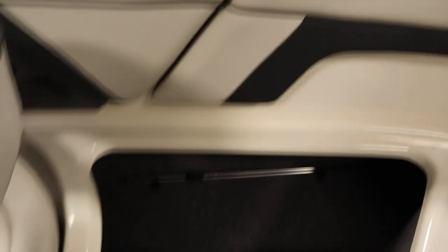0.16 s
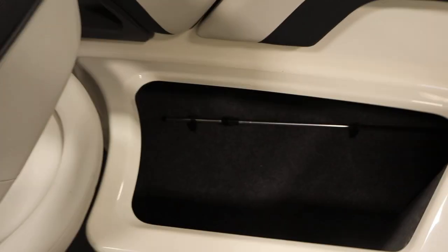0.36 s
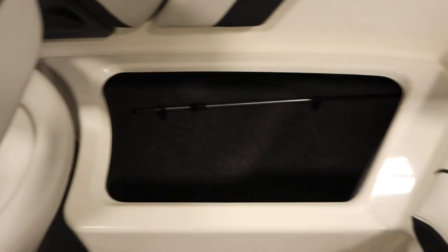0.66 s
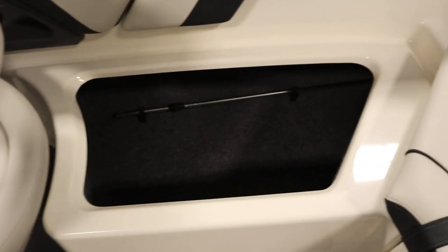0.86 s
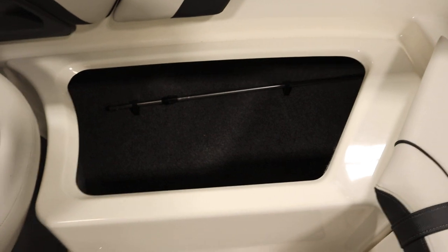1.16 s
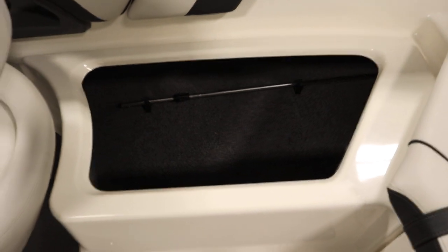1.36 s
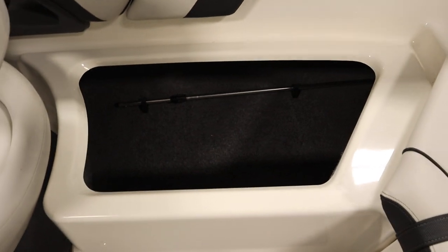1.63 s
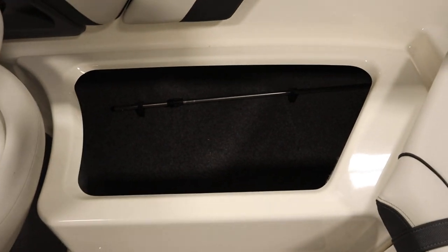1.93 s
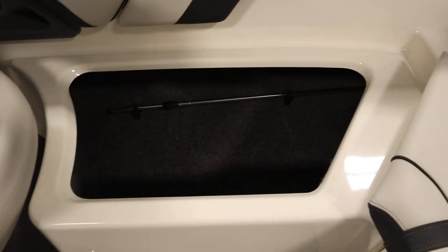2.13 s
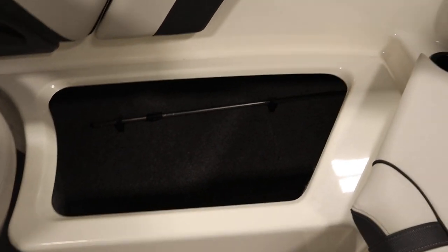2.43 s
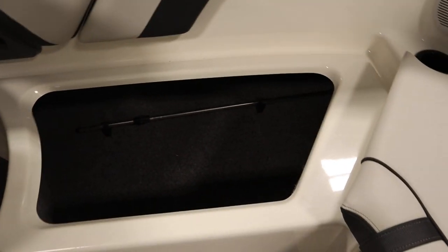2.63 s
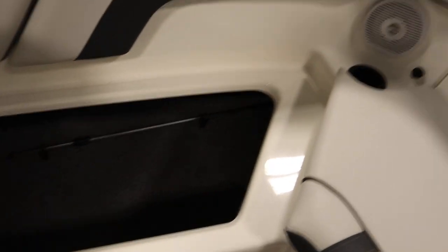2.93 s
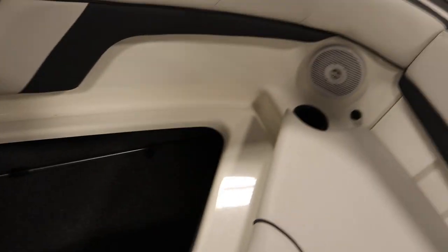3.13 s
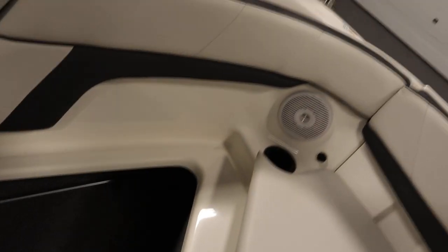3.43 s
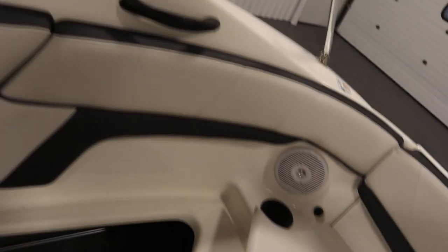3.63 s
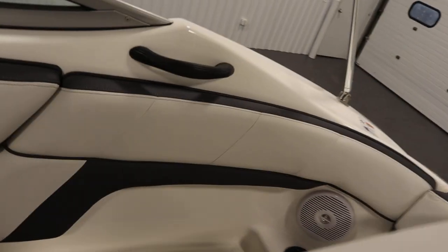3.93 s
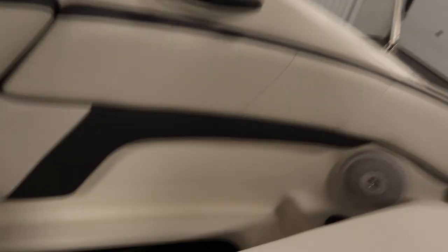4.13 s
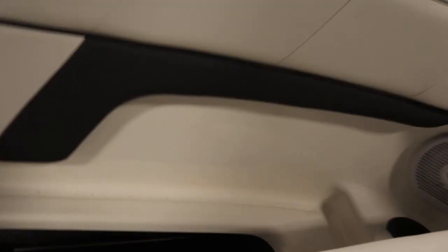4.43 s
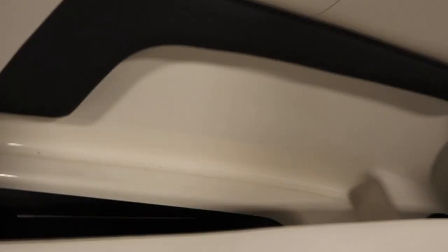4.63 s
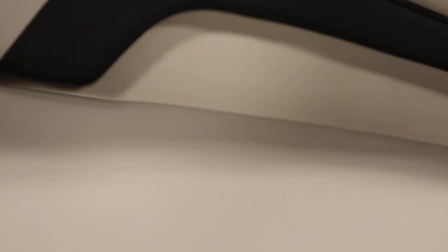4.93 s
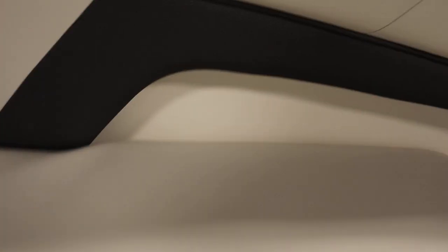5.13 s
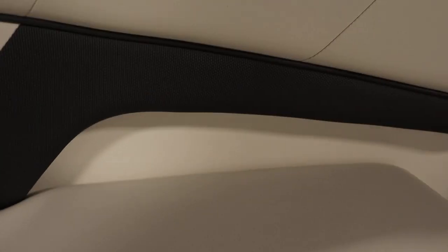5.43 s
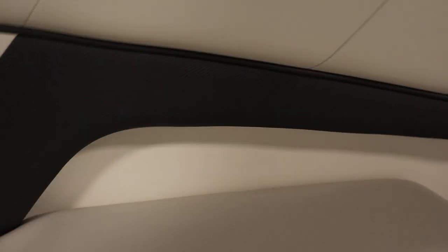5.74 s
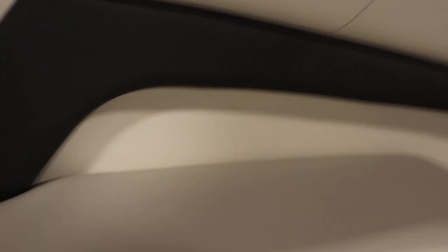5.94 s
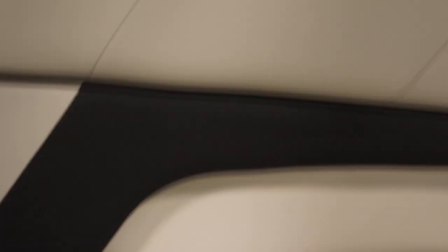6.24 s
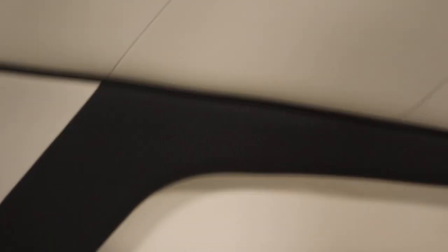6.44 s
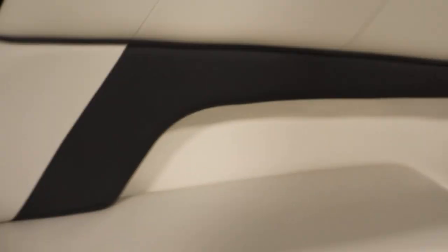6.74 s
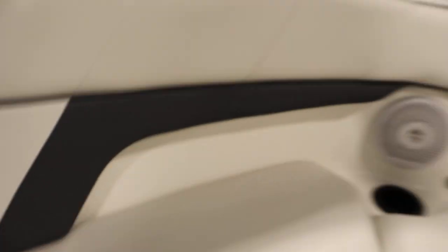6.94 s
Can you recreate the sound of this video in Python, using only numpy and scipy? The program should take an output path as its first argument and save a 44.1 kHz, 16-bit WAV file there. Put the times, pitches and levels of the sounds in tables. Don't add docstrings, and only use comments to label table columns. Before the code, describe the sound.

A low ventilation hum fills a large echoing indoor hall, heard through a close handheld stereo microphone on a boat. A strap rubs softly at the start, then a cluster of scuffs and hollow knocks lands around 0.4-0.6 s. From about 1 to 3.9 s it is nearly still, with a very faint high electrical whine, a tiny tick at 2.1 s and light rustling near 3 s. At 3.9 s movement resumes; a lid bangs down at 4.2 s with woody, boomy resonance, followed by heavy blows until 4.5 s. Vinyl hisses brightly around 4.9 s, with rattling bumps through 5.3 s. A rough squeak rises at 5.4 s, trailed by a thin whistle, then a hard crack at 5.56 s. Loud, slightly clipped booms hit at 6.1 and 6.5 s, amid creaking, crackling seams and scuffs, ending in small ticks around 7 s.

```python
import sys
import numpy as np
from scipy import signal
from scipy.fft import rfft, irfft, next_fast_len
from scipy.io import wavfile
from scipy.ndimage import uniform_filter1d

SR = 44100
rng = np.random.default_rng(int(sys.argv[2]) if len(sys.argv) > 2 else 0)


def unload_audio(sound):
    columns = np.transpose(np.atleast_2d(sound))
    steps = np.round(np.clip(columns, -1, 1) * 32767)
    wavfile.write(sys.argv[1], SR, steps.astype(np.int16))


def rack_gain(trim_db):
    fader = np.asarray(trim_db, float)
    return 10 ** (fader / 20)


N = 312669
T = np.arange(N) / SR


def shape(x, table):
    hz, db = np.transpose(table)
    size = next_fast_len(len(x))
    f = np.maximum(np.arange(size // 2 + 1) * SR / size, 1)
    gain = rack_gain(np.interp(np.log(f), np.log(np.maximum(hz, 1)), db))
    return irfft(rfft(x, size) * gain, size)[:len(x)]


def unit(x):
    return x / np.sqrt(np.mean(x ** 2))


def ring(x, hz, t60):
    r = np.exp(-np.log(1000) / (max(t60, .001) * SR))
    w = 2 * np.pi * hz / SR
    return signal.lfilter([0, r * np.sin(w)], [1, -2 * r * np.cos(w), r * r], x)


def walk(rate):
    k = int(SR / rate)
    return uniform_filter1d(np.repeat(rng.standard_normal(N // k + 1), k), k)[:N] * 0.57


def grit(rate, spread_db):
    slips = (rng.random(N) < rate / SR) * rack_gain(spread_db * np.minimum(rng.exponential(size=N), 2))
    return unit(rng.standard_normal(N) * (1 + signal.lfilter([1], [1, -.99], slips)))


def swells(rows, still_db=-200):
    s, db, rise, fall = np.transpose(rows)[:, :, None]
    t = T[::64] - s
    rise, fall = np.maximum(rise, .002), np.maximum(fall, .002)
    gain = rack_gain(db - 20 * np.where(t < 0, -t / rise, t / fall))
    total = np.sqrt(np.sum(gain ** 2, axis=0) + rack_gain(2 * still_db))
    return uniform_filter1d(np.interp(T, T[::64], total), size=300)


def glide(s, hz, wobble=1):
    return 2 * np.pi * np.cumsum(np.interp(T, s, hz) * wobble) / SR


def add_at(out, s, x):
    i = int(s * SR)
    out[..., i:i + x.shape[-1]] += x


# (frequency [Hz], density [dB per Hz])
HALL = [(12, -52), (20, -14.5), (91, 0), (142, -15), (210, -5.5), (293, -14), (347, -10.5), (446, -16),
        (513, -14), (923, -21), (1910, -26.5), (13200, -49.5), (16000, -85)]
# (time [s], frequency [Hz], level [dB])
WHINE = [
    (1.3, 1860, -85),
    (1.6, 1865, -70),
    (2.2, 1870, -67),
    (2.3, 1870, -80),
    (3.0, 1815, -83),
    (3.1, 1820, -68),
    (3.9, 1825, -69),
]


def hall():
    size = next_fast_len(N)
    spec = rfft(shape(rng.standard_normal(size), HALL))
    f = np.arange(size // 2 + 1) * SR / size
    out, swell = 0, walk(2.4)
    for lo in 16 * 2 ** np.arange(0, 10.5, .5):
        band = irfft(spec * ((f >= lo) & (f < lo * np.sqrt(2))), size)[:N]
        out = out + band * rack_gain(.5 * swell + 0.4 * walk(9))
    s, hz, db = np.transpose(WHINE)
    whine = np.sin(glide(s, hz)) * rack_gain(4.0 + np.interp(T, s, db, left=-200, right=-200))
    return unit(out) * rack_gain(-48) + whine


def echo(x):
    t60, wet_db = 0.52, -22.5
    t = T[:2 * SR]
    tail = rng.standard_normal(len(t)) * rack_gain(-60 * t / t60) * np.minimum(t / 0.0065, 1)
    tail = shape(tail, [(30, 6.5), (150, 7.5), (1500, -2), (5000, -9.5), (12000, -9.5)])
    return rack_gain(wet_db) * signal.fftconvolve(x, tail / np.sqrt(np.sum(tail ** 2)))[:N]


# (frequency [Hz], density [dB per Hz])
STRAP = [(900, -10), (1700, -5), (2200, -2.5), (2650, -5.5), (2900, -19), (5000, -31)]


def strap():
    level_db, end_s = -51.5, 0.342
    rub = unit(shape(rng.standard_normal(N), STRAP))
    return rack_gain(level_db + 2.5 * walk(38)) * rub * np.clip((end_s - T) / 0.028, 0, 1)


# (frequency [Hz], level [dB], t60 [s])
HULL = [(90, -23.5, 0.08), (128, -11.5, 0.24), (190.4, -2.5, 0.046), (266.7, -24, 0.25), (365, -13, 0.058)]
# (peak time [s], peak level [dB], 20 dB rise [s], 20 dB fall [s])
ROCKS = [(0.0, -36, .1, -0.2), (.47, -18.5, -0.02, 0.2), (.89, -41.5, 18, 0.4), (4.25, -29, -0.02, 1),
         (4.36, -25, 0.2, -0.9), (5.0, -38, 0, 3), (5.11, -39, -1, -1), (5.63, -25, -0.24, -0.1),
         (5.84, -41, -0.5, -1), (6.09, -36, 1, -0.8), (6.2, -16.5, 0.07, 0.04), (6.55, -19.5, 0.3, 0.17)]
# (peak time [s], peak level [dB], 20 dB rise [s], 20 dB fall [s])
DRAGS = [(0.03, -37, 0.35, 0.71), (.438, -23, 0.018, 0.075), (.6, -38.5, .2, 0.43),
         (.884, -38.5, 0.04, 0.33), (3.93, -30.5, 0.055, 1), (4.25, -26.5, 0.25, 0.38),
         (4.59, -26, 0.65, 0.33), (5.0, -20, 0.081, .12), (5.11, -21.5, 0.068, 0.14),
         (5.22, -33.5, .2, 0.31), (5.59, -18.5, 0.13, 0.054), (5.8, -31.5, 0.45, 0.12),
         (6.12, -44, 0.14, .5), (6.3, -26.5, 0.28, 0.63), (6.54, -27.5, .6, 0.11)]


def hull_load():
    rock = unit(ring(ring(rng.standard_normal(N), 43.6, 0.051), 43.6, 0.051))
    drag = grit(60, 4.2) * rack_gain(2.2 * walk(29))
    rumble = sum(rack_gain(g) * unit(ring(drag, f, 0.22 * d)) for f, g, d in HULL)
    rumble = unit(shape(rumble, [(40, -31), (80, 8.0), (350, -2.0), (800, 1.5), (3000, -42)]))
    return swells(ROCKS, -56.5) * rock + swells(DRAGS, -51.5) * rumble


# (start [s], stop [s], scuff centre [Hz], scuff level [dB], air hiss level [dB])
SLIDES = [(.08, 0.11, 5000, -55, -72), (.132, .14, 5000, -55, -70), (0.394, 0.514, 1480, -39, -43),
          (0.428, 0.446, 1140, -24, -60), (0.573, 0.63, 2980, -46, -50.5), (0.597, 0.73, 2440, -42, -81),
          (2.855, 2.99, 1200, -54, -67.5), (3.029, 3.056, 1900, -50.5, -84),
          (3.9025, 3.976, 1420, -42.5, -38), (4.062, 4.115, 2020, -64, -60.5),
          (4.267, 4.319, 3200, -35.5, -46), (4.345, 4.386, 2520, -36.5, -41),
          (5.031, 5.103, 704, -30.5, -58), (5.089, 5.167, 1020, -28.5, -37.5),
          (5.223, 5.256, 1170, -33.5, -59), (5.403, 5.45, 4500, -32.5, -52),
          (5.477, 5.58, 1950, -36.5, -45), (5.66, 5.722, 960, -29.5, -65.5),
          (6.125, 6.186, 1900, -36, -48.5), (6.292, 6.335, 1490, -34, -49.5),
          (6.508, 6.522, 1990, -25, -52), (6.755, 6.791, 2500, -45.5, -53.5)]
# (frequency [Hz], density [dB per Hz])
AIR = [(3000, -9), (6000, -7.5), (9000, -5.5), (11500, 3), (13500, -9), (15500, -14), (16200, -22)]


def slides():
    out, t = np.zeros(N + SR), T[:SR // 2]
    for start, stop, hz, db, air_db in SLIDES:
        length = stop - start
        gate = np.clip((length - t) / (0.27 * length), 0, 1) * np.minimum(t / 0.001, 1)
        scuff, air = rng.standard_normal((2, len(t)))
        colour = [(hz / 16, -50), (hz / 4, -22), (hz / 11.0, -4), (hz, 0),
                  (hz * 0.94, -2), (hz * 1.98, -10), (hz * 5, -26), (hz * 16, -60)]
        scuff = rack_gain(db) * unit(shape(scuff, colour))
        air = rack_gain(air_db) * unit(shape(air, AIR))
        add_at(out, start, gate * (scuff + air))
    return out[:N]


# (frequency [Hz], density [dB per Hz])
SCUFF = [(300, -5), (600, 4), (1000, -1), (2000, -3.5), (3000, -9), (5000, -16), (8000, -32.5)]
# (frequency [Hz], density [dB per Hz])
VINYL = [(880, -41), (1500, -28), (1640, -10), (2100, 0.5), (3410, 1.5), (11800, -2), (14600, -16),
         (15500, -15), (16000, -79)]
# (peak time [s], peak level [dB], 20 dB rise [s], 20 dB fall [s])
RUBS = [(0.0, -42.5, 0.088, 0.29), (.438, -31.5, 0.091, 0.044), (.65, -42, 0.32, 0.25),
        (.88, -54, 0.31, 2.4), (3.15, -52, 1, 1.14), (3.94, -44.5, 0.045, 0.25), (4.37, -39.5, .2, 0.49),
        (4.62, -39, 0.88, 0.72), (4.86, -33, 0.35, 0.75), (5.11, -29, 0.23, 0.15), (5.5, -35, 0.2, 0.48),
        (5.7, -35.5, 0.37, 0.34), (6.19, -36, 0.14, 0.47), (6.43, -38.5, 0.76, 0.41),
        (6.78, -42.5, 0.12, 0.71)]
# (peak time [s], peak level [dB], 20 dB rise [s], 20 dB fall [s])
SWEEPS = [(.54, -54.5, 0.33, 0.24), (.88, -64.5, 0.54, 0.55), (2.9, -67.5, 1.5, 1.5),
          (4.36, -41, 0.1, 0.059), (4.92, -28.5, 0.19, 0.32), (5.05, -30.5, 0.44, 0.11),
          (5.47, -43.5, 0.13, 0.23), (5.7, -44, 0.1, 0.19), (6.23, -57, 0.72, .6),
          (6.44, -48.5, 0.2, 0.076), (6.78, -60.5, 0.37, 0.6)]


def cushions(patches, shimmer):
    scuff = unit(shape(grit(150, 0.31), SCUFF) * patches)
    hiss = unit(shape(rng.standard_normal(N), VINYL) * shimmer)
    return swells(RUBS, -67) * scuff + swells(SWEEPS) * hiss + shimmer * slides()


# (time [s], frequency [Hz], peak level [dB], t60 [s])
LOCKER = [
    (0.029, 124.4, -28.5, 0.92),
    (4.206, 111.3, -9, 0.48),
    (4.412, 128, -9.5, 0.51),
    (4.50, 128.2, -10.5, 0.74),
    (4.597, 122, -20, 0.64),
    (5.58, 63, -14.5, 0.38),
    (6.164, 80.5, -2, 0.089),
]


def locker():
    out = 0
    for s, hz, db, t60 in LOCKER:
        t = np.maximum(T - s, 0)
        out = out - rack_gain(db - 60 * t / t60) * (1 - np.exp(-t / .01)) * np.sin(2 * np.pi * hz * t)
    return out


# (time [s], thud peak [dB], panel mode [Hz],
# upper modes peak [dB])
BLOWS = [(0.444, -12, 130, -15.5), (4.193, -6.5, 142, -6), (4.203, -2.5, 100, -15), (4.283, -8.5, 241, -23),
         (4.4, -1, 126, -7.5), (4.488, -2.5, 132, -12.5), (4.981, -8.5, 101, -15), (5.075, -10.5, 175, -11),
         (5.143, -12, 150, -34), (5.56, -18, 83.4, -36), (5.573, -16, 125, -12.5), (6.0755, 0, 162, -12),
         (6.105, -22, 258, -16.5), (6.148, -12, 172, -33), (6.156, -5, 102, -13),
         (6.171, -13.5, 192, -14.5), (6.207, -12.5, 116, -19), (6.524, -1, 185, -42),
         (0.066, -29.5, 103, -44), (0.394, -25, 121.5, -19), (0.432, -13.5, 73, -19.5),
          (0.496, -19, 72, -41), (0.942, -26.5, 95.4, -40), (2.114, -36, 130, -37),
          (3.929, -24, 294, -16.5), (3.954, -17, 285, -25), (4.037, -18.5, 247, -33),
          (4.088, -15, 194, -37), (4.291, -21.5, 97, -14), (4.707, -17, 156, -19), (4.728, -25, 135, -31),
          (5.226, -27, 138, -23), (5.272, -19.5, 236, -36), (5.404, -18.5, 217, -40.5),
          (5.504, -13.5, 163, -17), (5.688, -34, 90, -17.5), (6.116, -18, 77, -34),
          (6.307, -14.5, 246, -39), (6.706, -23, 251, -21), (6.76, -25, 134.5, -31),
          (6.822, -34, 95.5, -29), (6.974, -36.5, 258, -38)]


def thuds():
    free_t60, pressed_t60, light_ms, heavy_ms = 0.33, 0.035, 3.6, 12
    out, size = np.zeros((2, N + SR)), SR // 4
    t = T[:size]
    for s, db, hz, upper_db in sorted(BLOWS):
        chance, aim = rng.standard_normal(len(HULL)), rng.standard_normal()
        judder, spot = rng.standard_normal(64), rng.random(12)
        force = min(rack_gain(db), 1)
        t60 = free_t60 * (pressed_t60 / free_t60) ** np.sqrt(force)
        ms = light_ms + (heavy_ms - light_ms) * force
        push = np.zeros(size)
        n = int(.4 * SR / hz)
        push[:n] = -np.hanning(n)
        lean = np.diff(push, prepend=0) * n / 4
        low = ring(lean, hz, t60)
        for (f, g, d), u in zip(HULL[:4], chance):
            low = low + rack_gain(g + 3.7 * u) * ring(lean, f * (1 + 0.0726 * u), d * (1 - 0.32 * force))
        contact = np.interp(t * 4000, np.arange(64), judder, right=0)
        contact = contact * np.exp(-1000 * t / ms) * np.minimum(t / 0.0043, 1)
        octaves = (np.arange(12) + spot) / 4
        upper = sum(rack_gain(-.8 * ms * o) * ring(contact, 270 * 2 ** o, 0.094 / 1.32 ** o) for o in octaves)
        knock = rack_gain(db) * low / np.abs(low).max() + rack_gain(upper_db) * upper / np.abs(upper).max()
        add_at(out, s, knock * np.array([[1], [0.49 * np.tanh(aim)]]))
    return out[:, :N]


# (time [s], peak level [dB], length [ms], brightness [dB per octave])
CRACKS = [(0.3958, -22, 6.4, 5), (0.439, -16, 5.8, -4), (2.1185, -43, 5, 3), (2.6294, -50.5, 7, 11),
          (3.9032, -17.5, 5, 1.5), (4.1914, -14.5, 5.7, -4), (4.2829, -16, 6.9, 0.5),
          (4.2905, -12.5, 5.3, 0.5), (4.4022, -7.5, 6.4, -0.5), (4.4899, -12, 8.2, -1.5),
          (4.708, -24.5, 15, -0.5), (4.7303, -24, 30, -0.5), (5.074, -19.5, 10.5, 6),
          (5.1861, -21.5, 4.1, 3.5), (5.2251, -28, 15, -1), (5.386, -18, 32, -2), (5.4082, -14, 7.7, 1),
          (5.522, -21.5, 6.6, 2.5), (5.562, -1.5, 6.4, -0.5), (6.076, -4.5, 3.5, 3),
          (6.115, -10, 5.9, -4.5), (6.1547, -16, 6.2, 1), (6.1719, -5.5, 4.3, -5), (6.5169, -3.5, 6.6, 0.5),
          (6.7065, -31, 18, 2.5), (6.9735, -25.5, 5.8, -2.5), (7.005, -39, 4.2, 4)]
# (frequency [Hz], density [dB per Hz])
CRACK = [(300, 5), (800, 3.5), (2000, -0.5), (4000, -5.5), (7000, -15.5), (11000, -19), (16000, -43)]


def cracks():
    out, t = np.zeros(N + SR), T[:4096]
    for s, db, ms, tilt_db in CRACKS:
        decay = np.exp(-(1000 * t / ms) ** 2) + rack_gain(-18.5) * np.exp(-t / 0.0086)
        env = np.minimum(t / 0.00077, 1) * decay
        dull_db = 1.4 * min(tilt_db, 0)
        colour = [(f, g + tilt_db * np.log2(f / 2000) + dull_db * max(np.log2(f / 2500), 0))
                  for f, g in CRACK]
        noise = unit(shape(rng.standard_normal(len(t)), colour))
        add_at(out, s, rack_gain(db - 6.0) * env * noise)
    return out[:N]


# (time [s], peak level [dB], mode [Hz], left minus right [dB])
TICKS = [(0.429, -15, 662, -2.5), (0.436, -11, 746, -3.0), (0.44, -9, 770, 0.0), (0.45, -18, 649, 1.0),
         (2.118, -41.5, 899, -0.5), (3.039, -41, 1630, 0.5), (3.903, -20, 587, 3.5), (3.929, -25, 598, 5.0),
         (4.09, -32, 584, 3.0), (4.193, -7, 850, 6), (4.283, -9, 789, -3.5), (4.291, -9, 641, -1.0),
         (4.98, -16, 573, -1.0), (4.994, -17, 816, -3.5), (5.041, -13, 740, 0), (5.055, -15, 797, -2.5),
         (5.067, -15, 646, 0.0), (5.091, -16, 616, 0.0), (5.109, -17, 1000, 6.0), (5.118, -14, 738, 5.5),
         (5.136, -15, 1070, 5.5), (5.149, -16, 942, 4.5), (5.238, -16, 710, 5.0), (5.325, -23, 670, 4.0),
         (6.106, -17, 552, 1.5), (6.115, -20, 547, 3.5), (6.115, -12, 1010, -1.5), (6.134, -15, 980, 2.5),
         (6.172, -12, 552, 1.0), (6.215, -26, 595, -1.0), (6.233, -22.5, 576, -0.5), (6.278, -23, 783, 0),
         (6.294, -19, 953, -3.5), (6.378, -19, 678, -1), (6.404, -26, 1090, -3.0), (6.436, -28, 611, -4),
         (6.55, -25, 777, 0.0), (6.605, -27, 856, -1.0), (6.711, -30, 703, -0.5), (6.724, -29, 727, -1.0),
         (6.763, -22, 651, -2.5), (6.784, -24, 692, -2.0), (6.824, -30, 700, -2.5), (6.974, -27, 735, 0)]
# (time [s], peak level [dB], mode [Hz], left minus right [dB])
BUMPS = [(4.191, -12, 1140, 3), (4.1945, -4, 420, 3), (4.197, -4, 700, 6), (4.206, -17, 950, 3),
         (4.994, -4.5, 140, 1), (5.085, -7.5, 230, 0), (5.1, -8, 260, 0), (5.118, -8, 210, 3),
         (5.146, -9, 170, 5), (5.222, -12, 250, 2), (5.251, -13, 250, 2), (6.305, -16, 280, -4),
         (6.319, -13, 300, -2), (6.511, -15, 450, -1)]


def ticks():
    touch_ms, cycles = .25, 8
    out, t = np.zeros((2, N + SR)), T[:2048]
    for s, db, hz, pan_db in TICKS + BUMPS:
        touch = (1 + rng.standard_normal(len(t))) * np.exp(-1000 * t / touch_ms)
        tick = unit(ring(touch, hz, cycles / hz))
        tick = tick + rack_gain(-4) * unit(ring(touch, 2.2 * hz, cycles / hz / 3.8))
        tick = rack_gain(db - 5) * tick / np.abs(tick).max()
        add_at(out, s, tick * np.array([[1], [np.tanh(pan_db / 4)]]))
    return out[:, :N]


# (peak time [s], peak level [dB], 20 dB rise [s], 20 dB fall [s])
CRACKLES = [
    (.44, -27, 0.04, 0.05),
    (4.2, -23.5, 0.0063, 0.02),
    (5.06, -30.5, 0.06, 0.21),
    (5.14, -25.5, 0.13, 0.03),
    (5.24, -31, 0, 0.05),
    (5.69, -32.5, .06, 0.07),
    (6.17, -31, 0.08, 0.06),
    (6.32, -33.5, 0.09, .03),
    (6.385, -35, 0.06, .03),
    (6.49, -33, 0.11, 0.04),
]
# (frequency [Hz], level [dB])
SEAMS = [(620, 0.5), (930, 0), (1400, -3.5), (2100, -7.5), (2700, -10.5)]


def crackle():
    chance = 350 / SR / len(SEAMS)
    out = 0
    for f, g in SEAMS:
        pops = (rng.random(N) < chance) * rack_gain(3.8 * np.minimum(rng.exponential(size=N), 3))
        out = out + rack_gain(g) * unit(ring(pops, f, 7.6 / f))
    return swells(CRACKLES) * unit(out)


# (frequency [Hz], level [dB], t60 [s])
LID = [(146.4, -3, 0.14), (352, -6.5, 0.09), (538, -3, 0.043), (610, -4, 0.037), (846, -5, 0.07),
       (1100, -21, 0.067), (1240, -19, 0.073)]


def lid():
    t = np.maximum(T - 4.193, 0)
    top_db = max(db for _, db, _ in LID)
    attack = np.minimum(500 * t, 1)
    return sum(rack_gain(-9.5 + db - top_db - 60 * t / t60) * attack * np.sin(2 * np.pi * hz * t)
               for hz, db, t60 in LID)


# (time [s], slip rate [Hz], level [dB])
SQUEAK = [
    (5.404, 638, -26),
    (5.411, 754, -18.5),
    (5.424, 1490, -15.5),
    (5.435, 1733, -17),
    (5.443, 1810, -28.5),
    (5.455, 1750, -36),
    (5.466, 1700, -50),
]


def squeak():
    s, hz, db = np.transpose(SQUEAK)
    phase = glide(s, hz, 1 + .12 * walk(1500) + .07 * walk(300))
    over = sum(rack_gain(g + 8 * walk(250)) * np.sin((k + 2) * phase)
               for k, g in enumerate([-6, -11, -18, -26, -30, -34]))
    tone = np.sin(phase) + rack_gain(-8.0) * np.sin(0.82 * phase) + rack_gain(-4) * over
    slips = np.diff(np.sign(tone), prepend=0)
    buzz = unit(ring(ring(slips, 11200, 0.0023), 11500, 0.002))
    level = rack_gain(3 + 3 * walk(400) + np.interp(T, s, db, left=-200, right=-200))
    return (tone + rack_gain(-21.0) * buzz) * level


# (time [s], slip rate [Hz], level [dB])
WHISTLE = [
    (5.464, 1980, -52),
    (5.47, 1920, -37),
    (5.48, 1810, -35),
    (5.488, 1900, -36),
    (5.494, 2050, -44),
    (5.5, 2080, -60),
]
WHISTLE_PARTIALS = [0, -5, -9, -5, -18, -7]


def whistle():
    s, hz, db = np.transpose(WHISTLE)
    phase = glide(s, hz, 1 + .02 * walk(900))
    tone = sum(rack_gain(g + 3 * walk(200)) * np.sin((k + 1) * phase) for k, g in enumerate(WHISTLE_PARTIALS))
    return tone * rack_gain(np.interp(T, s, db, left=-200, right=-200))


# (time [s], first slip rate [Hz], settling time [s])
CREAK = [
    (6.298, 275, .1),
    (6.702, 240, .09),
]
# (peak time [s], peak level [dB], 20 dB rise [s], 20 dB fall [s])
SLIPS = [
    (6.325, -38.5, 0.056, 0.0091),
    (6.385, -38.5, .06, 0.018),
    (6.41, -41, .018, .015),
    (6.5, -39, 0.22, .009),
    (6.708, -44.5, .004, 0.077),
    (6.79, -53, .06, .12),
]
# (time [s], peak level [dB])
SETTLING = [(6.8252, -49), (6.8967, -49), (6.9094, -52), (6.9252, -48), (6.937, -46.5), (6.9522, -49),
            (6.9662, -51), (6.974, -43.5), (7.004, -48), (7.017, -48), (7.0294, -51), (7.0453, -42),
            (7.057, -50), (7.0654, -51)]


def creak():
    resting = 78
    rate = resting
    for s, first, settle in CREAK:
        rate = rate + (T >= s) * (first - resting) * np.exp(-np.abs(T - s) / settle)
    count = np.floor(np.cumsum(rate * (1 + 0.15 * walk(90))) / SR)
    slips = np.diff(count, prepend=0) * rack_gain(2.2 * rng.standard_normal(N)) * swells(SLIPS)
    s, db = np.transpose(SETTLING)
    slips[(s * SR).astype(int)] += rack_gain(db + 1)
    return slips


# (frequency [Hz], level [dB])
SEAT = [(1000, 4), (2200, -3.5), (5000, -19), (7800, -11), (10000, -19), (12000, -41)]


def seat(slips):
    shudder = signal.lfilter([1], [1, -.985], slips) * rng.standard_normal(N)
    return rack_gain(3.5) * sum(rack_gain(g) * ring(shudder, f, 0.0019) for f, g in SEAT)


# (frequency [Hz], side minus mid [dB])
WIDTH = [(60, -29.5), (110, -33.5), (200, -10.5), (380, -7), (700, -3.5), (1290, 0), (2380, 3.5), (4400, 6),
         (8120, 7.5), (15000, 4.5)]


def scene():
    chirp = squeak() + locker() + lid()
    patches, shimmer = rack_gain(1.9 * walk(60)), rack_gain(1.0 * walk(20.75))
    slips = creak()
    small = ticks() + np.array([strap() + whistle() + crackle(), strap() + crackle()])
    channels = []
    for knocks, tiny, way in zip(thuds(), small, (1, -1)):
        near = knocks + seat(slips) + chirp * way + hull_load() + cracks() + cushions(patches, shimmer)
        channels.append(near + echo(near) + hall() + tiny + echo(tiny))
    mid, side = channels
    side = shape(np.roll(side, 9), WIDTH)
    return np.array([mid + side, mid - side])


def roll_off(x):
    return signal.sosfilt(signal.butter(12, 16190, fs=SR, output="sos"), x)


def record(dry):
    dry = signal.sosfilt(signal.butter(3, 28, "high", fs=SR, output="sos"), dry)
    mix = np.clip(dry, -1, 1)
    return roll_off(mix)


dry = scene()
out = record(dry)
unload_audio(out)
```